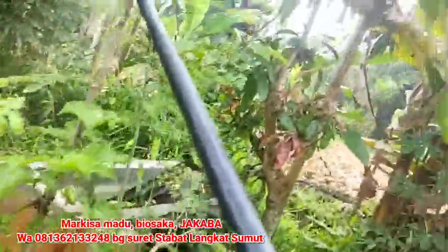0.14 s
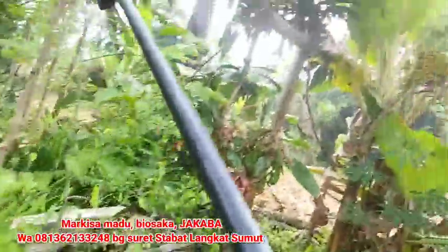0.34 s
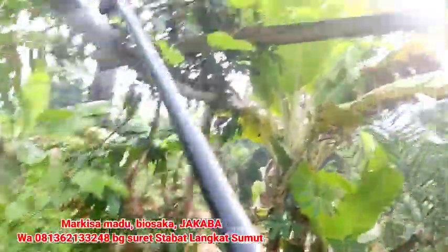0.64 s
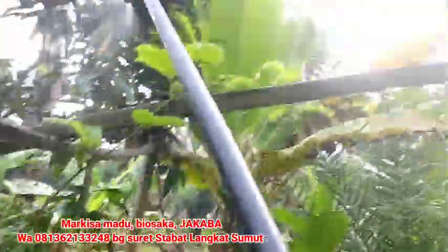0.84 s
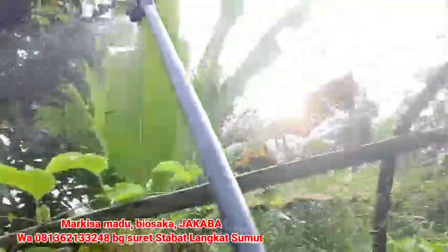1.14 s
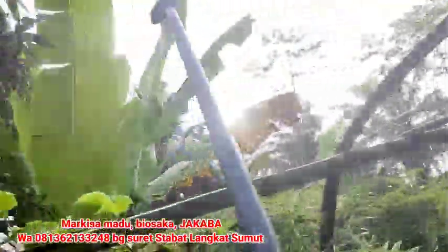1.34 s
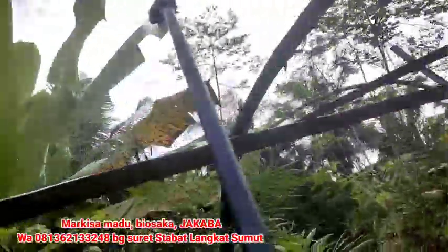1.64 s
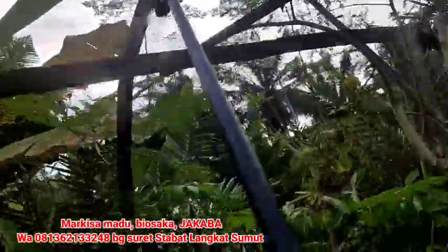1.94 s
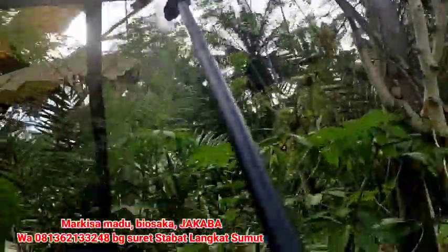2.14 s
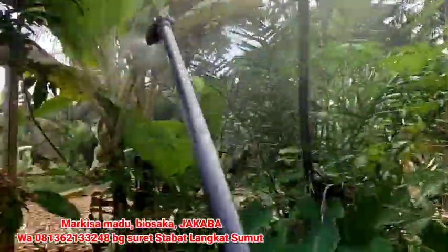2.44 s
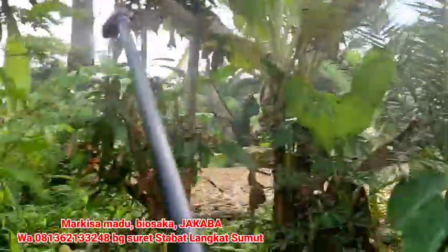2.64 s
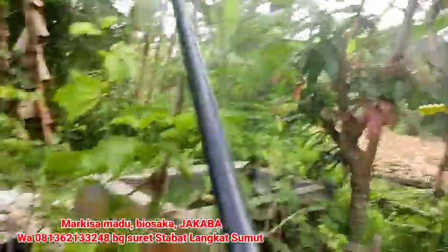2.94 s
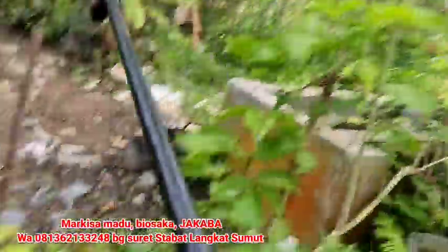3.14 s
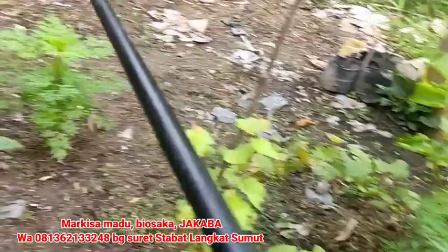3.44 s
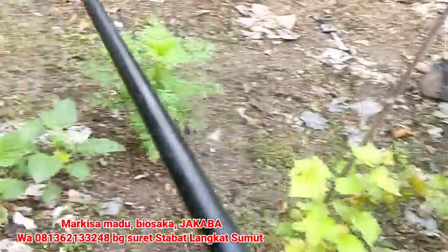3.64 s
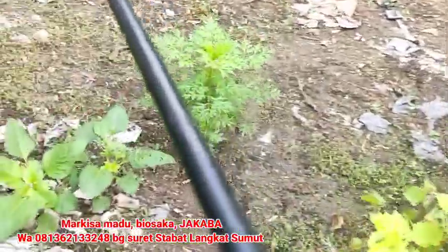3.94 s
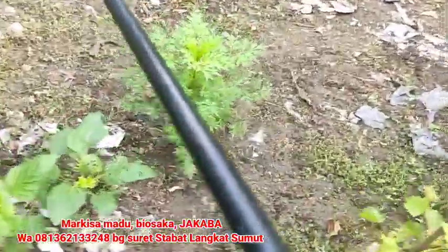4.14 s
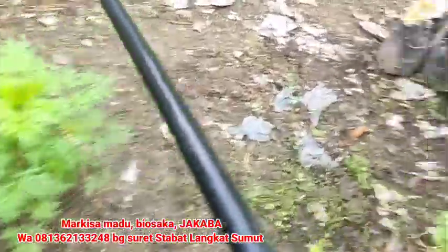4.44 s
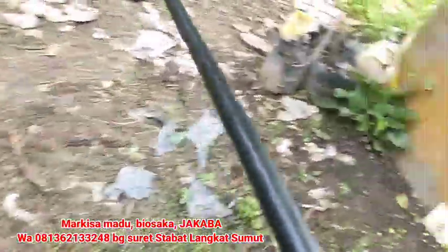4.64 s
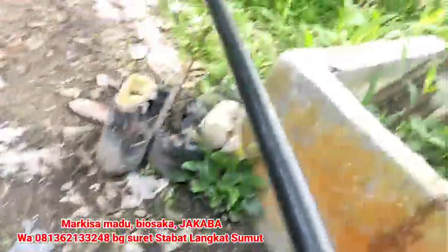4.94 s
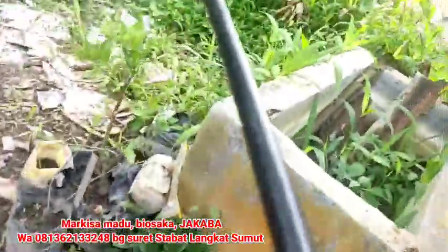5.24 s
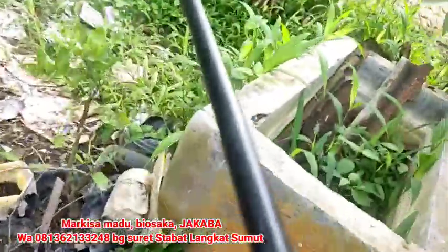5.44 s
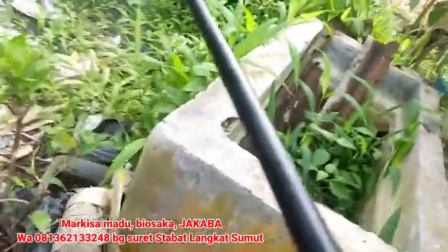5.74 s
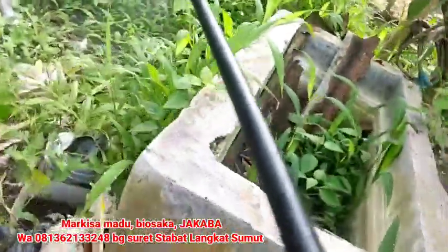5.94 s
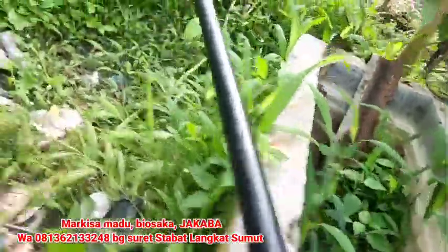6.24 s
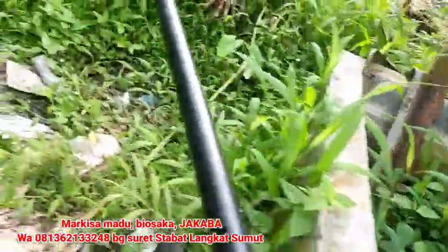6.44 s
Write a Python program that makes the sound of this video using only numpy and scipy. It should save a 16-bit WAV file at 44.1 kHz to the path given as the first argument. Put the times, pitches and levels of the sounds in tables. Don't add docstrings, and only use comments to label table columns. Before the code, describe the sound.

A hand sprayer hisses mist over garden leaves with plastic knocks and faint clucks, cuts out briefly, takes a hard bump, then shuts off.

```python
import sys
import numpy as np
from scipy import signal
from scipy.fft import rfft, irfft, next_fast_len
from scipy.io import wavfile
from scipy.ndimage import uniform_filter1d

SR = 44100
rng = np.random.default_rng(int(sys.argv[2]) if len(sys.argv) > 2 else 0)


def wav_record(signal):
    frames = np.transpose(np.atleast_2d(signal))
    bounded = np.clip(frames, -1, 1)
    quanta = np.round(bounded * 32767).astype(np.int16)
    wavfile.write(sys.argv[1], SR, quanta)


def volts_from_decibels(level):
    exponent = np.asarray(level, float) / 20
    return 10 ** exponent


N = 291223
PORT_LAG_S = .00016


def evened(x):
    return x / np.sqrt(np.mean(x ** 2) + 1e-20)


def over_hz(points, hz):
    f, value = np.transpose(points)
    return np.interp(np.log(hz + 1), np.log(f + 1), value)


def over_time(rows):
    s, *columns = np.transpose(rows)
    return [np.interp(np.arange(N) / SR, s, column) for column in columns]


def add(mix, s, sound):
    part = mix[:, round(s * SR):][:, :sound.shape[1]]
    part += sound[:, :part.shape[1]]


def panned(db):
    return volts_from_decibels(np.array([db / 2, -db / 2]))


def swells(s, db, length):
    rise_share, span_db = 0.55, 15.5
    u = (np.arange(N) / SR - s[:, None]) / length[:, None]
    return volts_from_decibels(2 * (db[:, None] - span_db * np.where(u < 0, -u / rise_share, u)))


def resonate(x, hz, width):
    turn = np.exp(2j * np.pi * np.cumsum(hz * np.ones(x.shape[-1])) / SR)
    r = np.exp(-np.pi * width / SR)
    return 2 * (turn * signal.lfilter([(1 - r) ** 2], [1, -2 * r, r * r], x / turn)).real


# frequency [Hz], likeness [0 to 1].
LIKENESS = [(30, .68), (100, .82), (300, .8), (800, .6), (2000, .55), (3500, .6), (6000, .3), (12000, .15)]


def hiss(colour, patchy_db, flicker_db, size=512, direct=0.99, lag_s=PORT_LAG_S):
    hop = size // 4
    frames, hz = 4 * N // size + 5, np.fft.rfftfreq(size, 1 / SR)
    a, b, c, d, patches = rng.standard_normal((frames, len(hz), 5)).T
    patches = uniform_filter1d(patches, size=6, axis=0)
    patches = evened(uniform_filter1d(patches, size=14, axis=1))
    flicker = evened(uniform_filter1d(rng.standard_normal(frames), size=3))
    at = np.minimum(np.arange(frames) * hop, N - 1)
    direct, lag_s = (np.broadcast_to(v, N)[at] for v in (direct, lag_s))
    same = np.clip(over_hz(LIKENESS, hz)[:, None] * direct, 0, .995)
    right = a + 1j * b
    late = right * np.exp(-2j * np.pi * hz[:, None] * lag_s)
    z = np.array([same * late + np.sqrt(1 - same ** 2) * (c + 1j * d), right])
    z *= volts_from_decibels(over_hz(colour, hz)[:, None] + patchy_db * patches + flicker_db * flicker)
    return evened(signal.istft(z, nperseg=size, noverlap=3 * hop)[1][:, :N])


# time [s], jet level [dB], left-right [dB].
JET = [(0, -42, 0.5), (.55, -43, -1), (.75, -42.5, -2), (1.3, -44, -3), (1.84, -41.5, -2), (2.15, -42, -1),
       (2.58, -42.5, -0.5), (3.0, -40, -1.5), (3.19, -43.5, -5.5), (3.23, -67.5, -1.5), (3.88, -59, -1),
       (3.92, -43.5, 4), (4.6, -51.5, 3.5), (4.865, -51, 13), (4.9, -43, -4), (6.17, -46, -4),
       (6.2, -60, 13), (6.6, -65, -2)]
# frequency [Hz], level [dB].
JET_COLOUR = [(600, -9), (1500, -8), (3000, 5), (4500, 6.5), (6500, 3), (9000, 1.5), (12000, -0.5),
              (14500, -8.5)]
# time [s], likeness [factor], port lag [factor].
FACING = [(0, .9, 1), (.5, 1.15, 1.05), (1.02, 1.25, .85), (1.035, 3.6, .7), (1.18, 3.6, .73),
          (1.2, 1, .85), (1.32, 1.45, 1.03), (1.83, 1.6, .98), (1.88, .3, 1), (2.1, .5, 1), (2.3, 1.2, 1),
          (3.15, 1.2, .9), (3.25, .2, 1), (4.75, .5, 1), (4.9, 1.15, .9), (6.17, 1.3, .87), (6.2, .3, 1),
          (6.6, .4, 1)]
# peak time [s], mist level [dB], drops level [dB], length [s], left-right [dB].
SPLASHES = [(0.18, -37.5, -38.5, 0.18, 3.5), (0.822, -45, -39, 0.024, 3), (0.99, -41, -37, 0.13, 9),
            (1.06, -43, -66, 0.28, -0.5), (1.233, -36.5, -31.5, 0.073, 4.5),
            (1.846, -56, -34.5, 0.0086, -2), (4.724, -48.5, -48.5, 0.59, 6),
            (1.919, -24.5, -32.5, 0.078, 5), (1.94, -28, -33.5, 0.16, 4), (2.656, -42, -46.5, 0.26, 3),
            (3.977, -40.5, -51, 0.11, 7), (4.063, -33.5, -37, 0.086, 4), (4.244, -39.5, -46, 0.28, 2),
            (4.335, -52, -38, 0.029, 5), (4.403, -45.5, -44, 0.051, 11), (5.57, -41, -36.5, 0.029, 6),
            (5.666, -53, -56, 0.07, 7), (6.361, -38.5, -44, 0.072, 0), (6.415, -38, -66, 0.13, 2),
            (1.887, -29.5, -47, 0.023, 5), (6.53, -66, -70, 0.073, 1)]


def jet():
    free_fine_db, splash_fine_db = 2, 0.5
    level_db, pan_db = over_time(JET)
    s, mist_db, _, length, side_db = np.transpose(SPLASHES)
    free, bursts = volts_from_decibels(2 * level_db), swells(s, mist_db, length)
    power = free + bursts.sum(0)
    pan_db = (free * pan_db + side_db @ bursts) / power
    fine_db = splash_fine_db + (free_fine_db - splash_fine_db) * free / power
    facing, lag = over_time(FACING)
    spray = hiss(JET_COLOUR, patchy_db=0.88, flicker_db=0.48, direct=facing, lag_s=lag * PORT_LAG_S)
    top = signal.sosfiltfilt(signal.butter(2, 7500, "high", fs=SR, output="sos"), spray)
    return np.sqrt(power) * volts_from_decibels(8.5) * panned(pan_db) * (spray + (volts_from_decibels(fine_db) - 1) * top)


# frequency [Hz], level [dB].
PATTER_COLOUR = [(500, -1.5), (1000, -3.5), (1500, -2), (2600, 2.7), (3600, 5), (6000, -76)]
# frequency [Hz], level [dB].
RUSTLE_COLOUR = [(100, -6), (200, -5.5), (500, -5.5), (1000, -7), (1400, -9), (2500, -19.5)]
# peak time [s], level [dB], length [s].
RUSTLES = [(0.08, -45, 0.13), (0.248, -46, 0.15), (0.352, -33.5, 0.043), (0.617, -37.5, 0.048),
           (0.682, -38.5, 0.038), (0.802, -39.5, 0.079), (0.891, -29, 0.055), (1.036, -33, 0.052),
           (1.498, -44.5, 0.63), (1.847, -25, 0.015), (1.987, -39.5, 0.27), (2.948, -47.5, 0.7),
           (4.053, -49, 0.045), (4.26, -35.5, 0.18), (4.341, -36, 0.063), (4.415, -41.5, 0.072),
           (4.76, -45, 0.67), (5.103, -40.5, 0.078), (5.46, -55, 0.11), (5.61, -43.5, 0.16),
           (6.078, -53, 0.17), (6.388, -43.5, 0.12)]


def leaves():
    patter_under_db, patter_floor_db = -13.5, -59
    rustle_under_db, rustle_floor_db = -4.5, -64
    jet_db = over_time(JET)[0]
    s, _, drops_db, length, _ = np.transpose(SPLASHES)
    shelter_db = -4.2 * (over_time(FACING)[0] - 1)
    wet = volts_from_decibels(2 * (jet_db + patter_under_db + shelter_db)) + volts_from_decibels(2 * patter_floor_db)
    wet = wet + swells(s, drops_db, 0.62 * length).sum(0)
    stir = volts_from_decibels(2 * (jet_db + rustle_under_db)) + volts_from_decibels(2 * rustle_floor_db)
    stir = stir + swells(*np.transpose(RUSTLES)).sum(0)
    drops = volts_from_decibels(2.3 * rng.exponential(1, N)) * (rng.random(N) < 1500 / SR)
    grain = evened(1.05 + np.convolve(drops, np.exp(-np.arange(200) / 21.0))[:N])
    patter = grain * hiss(PATTER_COLOUR, patchy_db=1.8, flicker_db=.8, direct=.45, lag_s=-.6 * PORT_LAG_S)
    patter = signal.sosfilt(signal.butter(2, 9000, fs=SR, output="sos"), patter)
    rustle = hiss(RUSTLE_COLOUR, patchy_db=2.5, flicker_db=2.8, size=1024)
    return volts_from_decibels(7.5) * np.sqrt(wet) * patter + volts_from_decibels(2.0) * np.sqrt(stir) * rustle


# frequency [Hz], level [dB].
RUMBLE_COLOUR = [(15, 5), (30, -1.5), (70, -1), (130, -9.5), (250, -22), (500, -30.5)]
# peak time [s], air level [dB], hum level [dB], length [s].
GUSTS = [(0, -43.5, -31, 0.6), (0.603, -41.5, -59, 0.58), (1.32, -50, -33, 0.21), (1.97, -50, -44, .15),
         (2.303, -37, -34, 0.29), (2.926, -35, -31, 0.062), (3.322, -52, -26, 0.077),
         (3.69, -44.5, -34.5, 0.26), (4.11, -47, -35.5, 0.41), (4.49, -58, -33, 0.35),
         (4.613, -38, -33, 0.11), (5.11, -59, -37, 0.37), (5.598, -61, -53, .5), (6.36, -61, -38.5, 0.59)]


def rumble():
    hum_hz, air_floor_db, hum_floor_db = 53.5, -41, -47
    s, air_db, hum_db, length = np.transpose(GUSTS)
    air = np.sqrt(volts_from_decibels(2 * air_floor_db) + swells(s, air_db, length).sum(0))
    drone = np.sqrt(volts_from_decibels(2 * hum_floor_db) + swells(s, hum_db, length).sum(0))
    stirring = rng.standard_normal(N) + .5 * rng.standard_normal((2, N))
    hum = evened(resonate(stirring, hum_hz, 7.1))
    hum = evened(hum + 0.85 * np.sin(2 * np.pi * hum_hz * np.arange(N) / SR))
    lumps = hiss(RUMBLE_COLOUR, patchy_db=2.0, flicker_db=-2.0, size=4096)
    return air * volts_from_decibels(4.5) * lumps + drone * hum


# frequency [Hz], level [dB].
CHORUS_COLOUR = [(5800, -15), (7000, -6.5), (8500, -7.5), (9500, -1), (11200, 8), (11900, -9), (12500, -28),
                 (15000, -24)]
# time [s], level [dB].
CICADA = [(0, -23), (3.2, -61), (3.55, -56), (3.9, -46), (4.2, -67), (6.6, -59)]
# time [s], level [dB].
CRICKET = [(0, -72), (3.1, -68), (3.3, -69), (3.63, -68.5), (3.68, -72), (6.6, -72)]
# time [s], level [dB].
YARD = [(0, -26), (3.2, 2.5), (6.6, 4.5)]


def insects():
    cicada_hz, cricket_hz, throb_hz = 7450, 4420, 20.5
    n = np.arange(N)
    chorus = volts_from_decibels(-46) * hiss(CHORUS_COLOUR, patchy_db=1.5, flicker_db=.4, direct=.3)
    cicada = evened(resonate(rng.standard_normal((2, N)), cicada_hz, 370.0))
    throb = np.maximum(np.sin(2 * np.pi * throb_hz * n / SR), 0) ** 1.2
    uneven = evened(uniform_filter1d(np.sin(n / 1500.) + np.sin(n / 870.), size=3))
    throb = throb * volts_from_decibels(3 * uneven)
    cricket = evened(throb * resonate(rng.standard_normal((2, N)), cricket_hz, 180.0))
    cicada = volts_from_decibels(over_time(CICADA)[0]) * cicada
    cricket = volts_from_decibels(over_time(CRICKET)[0]) * cricket * panned(26.0)[:, None]
    return volts_from_decibels(over_time(YARD)[0]) * (chorus + cicada + cricket)


# start [s], peak level [dB], pitch [Hz], t60 [s].
TICKS = [(.0565, -21, 300, .014), (.8098, -26, 1200, .005), (1.8452, -23, 3200, .004),
         (1.9045, -17, 3300, .004), (1.9045, -19, 800, .007), (4.0485, -24, 700, .004),
         (4.331, -29, 1000, .008), (4.3424, -18, 1200, .005), (4.3494, -24, 1000, .005),
         (4.3795, -28, 900, .009), (4.4095, -26, 1200, .006), (4.6645, -23, 1700, .005),
         (4.669, -12, 1000, .006), (4.6703, -14, 2200, .005), (4.7804, -19, 1100, .007),
         (4.792, -31, 1400, .012), (4.817, -29, 2000, .006), (5.553, -31, 4300, .007),
         (5.5694, -19, 1700, .0035), (5.5715, -27, 2600, .005)]


def ticks():
    out, t = np.zeros((2, N)), np.arange(900) / SR
    for s, db, hz, t60 in TICKS:
        tick = -np.sin(2 * np.pi * hz * t) * volts_from_decibels(-60 * t / t60)
        add(out, s, volts_from_decibels(db) / abs(tick).max() * tick * np.ones((2, 1)))
    return out


# time [s], peak level [dB], ring pitch [Hz], t60 [s].
KNOCKS = [(0.058, -21, 279, 0.043), (0.346, -37, 930, 0.075), (0.811, -33, 335, 0.048),
          (0.8868, -21, 368, 0.027), (0.895, -23, 327, 0.072), (1.22, -34, 1400, 0.042),
          (1.275, -30.5, 587, 0.062), (1.779, -40, 834, 0.064), (1.841, -22, 270, 0.034),
          (1.901, -31, 569, 0.22), (1.938, -24, 573, 0.027), (2.065, -30, 515, 0.052),
          (2.275, -41, 209, 0.037), (2.367, -31.5, 610, 0.023), (2.449, -39, 454, 0.15),
          (3.609, -37, 240, 0.15), (3.872, -41, 2200, 0.038), (4.05, -19, 2048, 0.021),
          (4.074, -43, 2170, 0.098), (4.405, -35, 230, 0.031), (4.451, -30.5, 660, 0.025),
          (5.058, -33, 422, 0.043), (5.679, -31.5, 280, 0.042), (5.977, -40.5, 344, 0.092),
          (6.33, -44, 484, 0.041), (6.3684, -14.5, 476, 0.018), (6.376, -24, 498, 0.059),
          (0.0575, -28.5, 690, 0.034)]


def knocks():
    modes = ((1, 1), (.62, .15), (1.4, .55), (2.1, .25))
    out, t = np.zeros((2, N)), np.arange(5000) / SR
    cracks = signal.lfilter([.12], [1, -1.4, .49], rng.standard_normal((len(KNOCKS), len(t))))
    for (s, db, hz, t60), crack in zip(KNOCKS, cracks):
        t60 = max(t60, .008)
        ring = sum(g * np.sin(2 * np.pi * k * hz * t) * volts_from_decibels(-60 * t * k / t60) for k, g in modes)
        crack = .6 * crack * volts_from_decibels(-60 * t / (1.2 * t60))
        tap = (ring + crack) * np.minimum(t / .0009, 1)
        late = np.roll(tap, round(PORT_LAG_S * SR))
        gain = -volts_from_decibels(db + 4.5) / abs(tap).max()
        add(out, s + .0035, gain * np.array([late, tap]) * panned(2)[:, None])
    return out


# start [s], length [s], start pitch [Hz], level [dB].
CLUCKS = [(0.063, 0.043, 1030, -48), (.25, 0.029, 505, -49), (0.27, 0.027, 1024, -46),
          (0.378, 0.036, 1000, -59), (0.514, .04, 995, -54), (0.94, 0.053, 987, -49),
          (1.324, 0.044, 970, -51), (1.445, 0.043, 930, -43.5), (2.587, 0.033, 947, -43),
          (2.832, 0.037, 883, -45), (2.96, 0.044, 880, -61), (3.066, 0.038, 886, -52),
          (3.258, 0.041, 868, -50)]
# start [s], length [s], start pitch [Hz], level [dB].
CALLS_HELD = [(0.113, 0.058, 1300, -45), (.97, 0.091, 1283, -37.5), (1.04, 0.067, 1220, -43.5),
              (1.08, 0.038, 507, -39.5), (1.094, 0.046, 1010, -44), (1.12, 0.1, 1140, -46),
              (1.35, 0.041, 1177, -45), (1.465, 0.13, 1188, -48.5), (1.56, 0.05, 252, -46),
              (1.56, 0.042, 495, -45.5), (2.477, 0.039, 1290, -47), (2.61, 0.15, 1181, -51.5),
              (3.1, 0.022, 1215, -46), (3.283, 0.041, 1216, -38)]


def hens():
    out = np.zeros((2, N))
    for rows, glide in ((CLUCKS, 1.08), (CALLS_HELD, 0.96)):
        for s, length, hz0, db in rows:
            turns = np.cumsum(np.linspace(hz0, hz0 * glide, round(length * SR))) / SR
            lag_turns = np.array([[.0004], [0]]) * hz0
            tone = np.sin(2 * np.pi * (turns - lag_turns)) + 0.067 * np.sin(4 * np.pi * turns)
            flutter = 1 + 0.5 * np.sin(2 * np.pi * 38 * turns / hz0)
            add(out, s, volts_from_decibels(db + 7.5) * tone * np.hanning(len(turns)) * flutter)
    echo = rng.standard_normal((2, 6000)) * volts_from_decibels(-60 * np.arange(6000) / SR / 0.28)
    echo = echo / np.linalg.norm(echo[0])
    return out + volts_from_decibels(-1) * signal.oaconvolve(out, echo, axes=1)[:, :N]


# time [s], pitch [Hz], level [dB], clear share [0
SQUEAKS = [
    [(.2, 13600, -47, 0), (.3, 13600, -41, 0), (.332, 12500, -43, 0), (.34, 11000, -44, .7),
     (.362, 10700, -43, 0.78), (.376, 10050, -38, .85), (.398, 9750, -40, .85)],
    [(.958, 10000, -42, .6), (1.0, 11400, -47, 0.23), (1.03, 13200, -44, 0), (1.15, 13300, -43, 0),
     (1.21, 12500, -41, 0.028), (1.24, 11000, -42, .5), (1.28, 9740, -33, .9)],
    [(1.075, 4850, -58, 1), (1.11, 4830, -54, 1), (1.145, 4660, -58, 1)],
    [(6.34, 12000, -44, 0), (6.36, 11800, -39, 0), (6.41, 11300, -45, 0)],
]
# start [s], length [s], pitch [Hz], level [dB].
PING = (.8275, .008, 6500, -23)


def squeaks():
    out = np.zeros((2, N))
    for rows in SQUEAKS:
        s, hz, db, clear = np.transpose(rows)
        t = np.arange(s[0], s[-1], 1 / SR)
        air, clear = rng.standard_normal(len(t)), np.clip(np.interp(t, s, clear), 0, 1)
        wide, thin = (evened(resonate(air, np.interp(t, s, hz), width)) for width in (2400., 330.))
        squeak = clear * thin + (1 - clear) * wide
        squeak = volts_from_decibels(np.interp(t, s, db)) * squeak * signal.windows.tukey(len(t), .15)
        add(out, s[0], squeak * panned(15.4)[:, None])
    s, length, hz, db = PING
    t = np.arange(0, length, 1 / SR)
    ping = volts_from_decibels(db) * np.sin(2 * np.pi * hz * t) * np.hanning(len(t))
    add(out, s, ping * panned(19.0)[:, None])
    return out


# start [s], level [dB], length [s], left-right [dB].
BLOW = [
    (4.612, -18.5, .058, 0),
    (4.622, -17, .018, 0),
    (4.627, -13, .004, -3),
    (4.6682, -12, .0014, -4),
    (4.6692, -4, .003, -4),
    (4.6747, -15, .0014, -12),
]


def blow():
    press_s, rebound_s, settle_s = .0016, .0008, .0026
    out, t = np.zeros((2, N)), np.arange(3000) / SR
    for s, db, length, side_db in BLOW:
        u = t / length
        grit = rng.standard_normal((2, len(t))) * np.minimum(4 * u, 1) * np.exp(-np.maximum(u - .8, 0) * 7)
        dull = signal.sosfilt(signal.butter(2, 9500, fs=SR, output="sos"), grit)
        grit = dull + .5 * resonate(grit, 3100, 2200.0) * 3
        add(out, s, volts_from_decibels(db) * 0.49 * grit * panned(side_db)[:, None])
    after = np.maximum(t - press_s, 0)
    swing = -np.minimum(t / press_s, 1) ** 2 * np.cos(np.pi * (after / rebound_s) ** .4)
    swing = swing * np.exp(-after / settle_s)
    add(out, 4.6679, volts_from_decibels(-8.5) * np.array([np.roll(swing, 8), swing]))
    return out


def ducking():
    since = np.maximum(np.arange(N) / SR - 4.677, 0)
    return volts_from_decibels(-11.5 * np.minimum(since / 0.023, 1) * np.exp(-since / 1.05))


def scene():
    yard = insects() + hens() + rumble()
    return yard + jet() + leaves() + squeaks() + knocks() + ticks() + blow()


# pitch [Hz], width [Hz], level [dB].
PORTS = [
    [(10890, 1030, 9.5), (9970, 470, -2), (12760, 2000, -8.5)],
    [(8954, 837, 15), (11700, 400, -43)],
]


def port_rings(dry):
    size = next_fast_len(N + 4096)
    hz = np.fft.rfftfreq(size, 1 / SR)
    rings = [1 + sum(volts_from_decibels(db) * 1j * hz * w / (f * f - hz * hz + 1j * hz * w) for f, w, db in port)
             for port in PORTS]
    treble_edge = 1 / (1 + (hz / 15000) ** 40)
    return irfft(rfft(dry, size) * np.array(rings) * treble_edge, size)[:, :N]


def low_pass(x):
    return signal.sosfilt(signal.butter(12, 14400, fs=SR, output="sos"), x)


def record(dry):
    mix = np.clip(port_rings(dry), -.9, .9) * ducking()
    return low_pass(mix)


dry = scene()
out = record(dry)
wav_record(out)
```